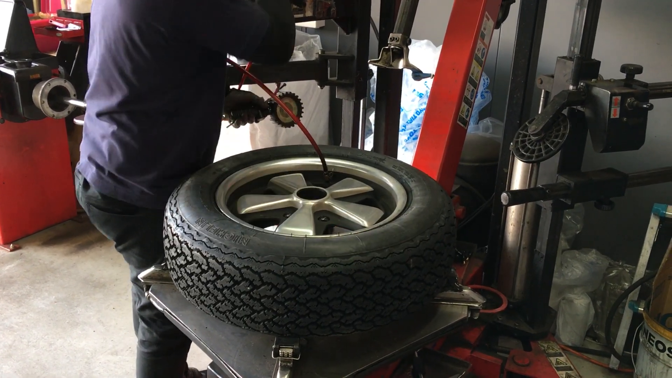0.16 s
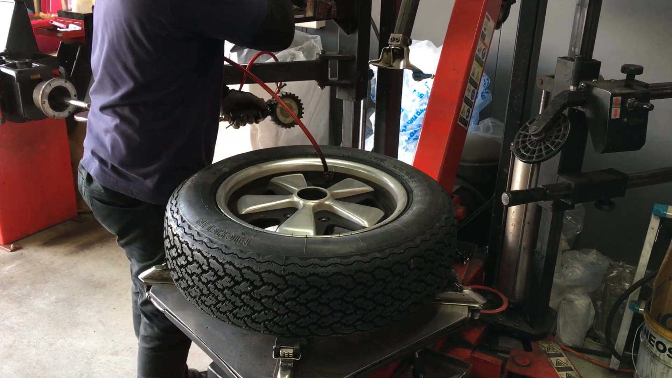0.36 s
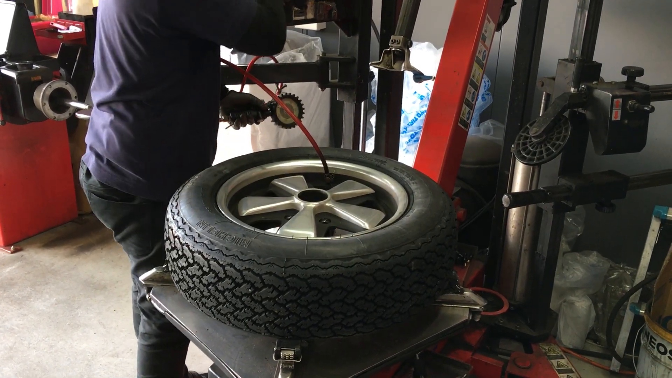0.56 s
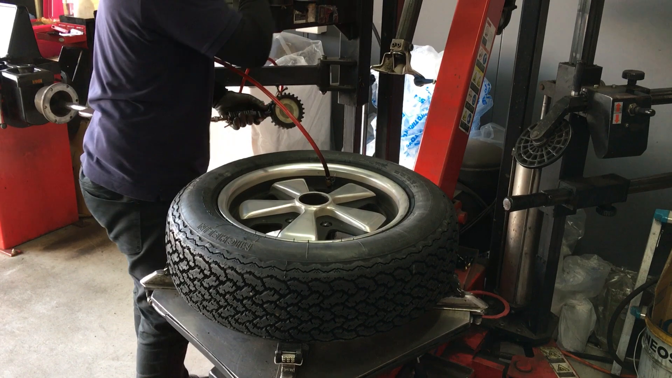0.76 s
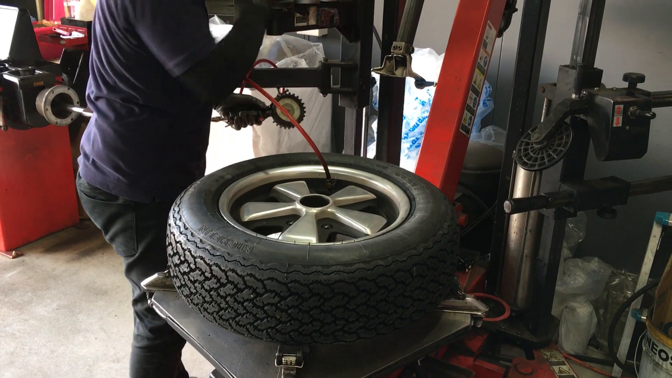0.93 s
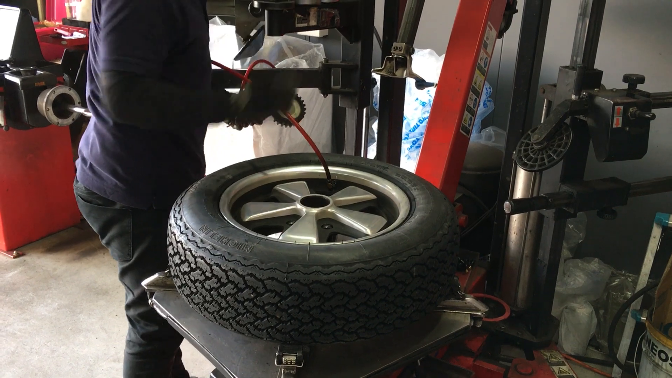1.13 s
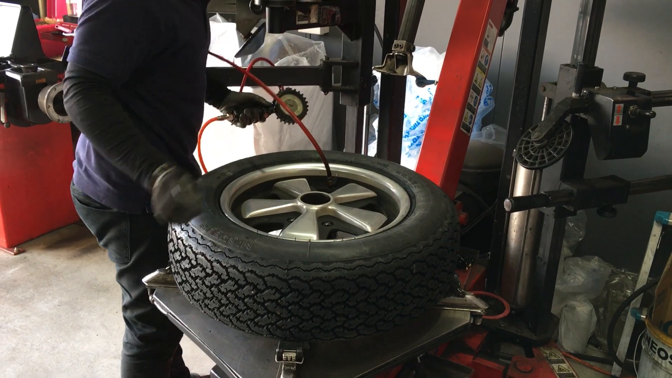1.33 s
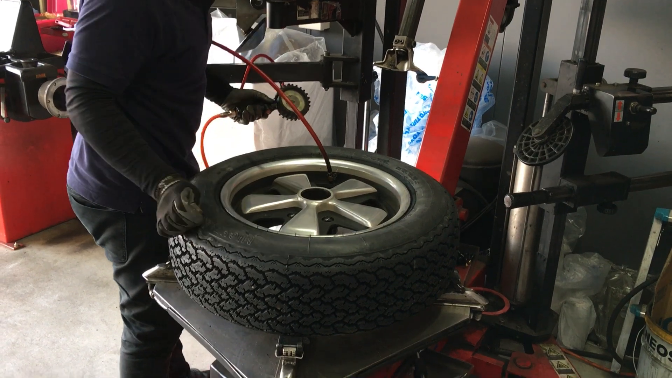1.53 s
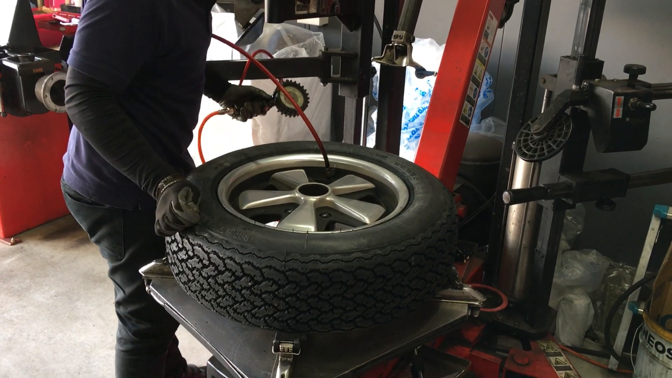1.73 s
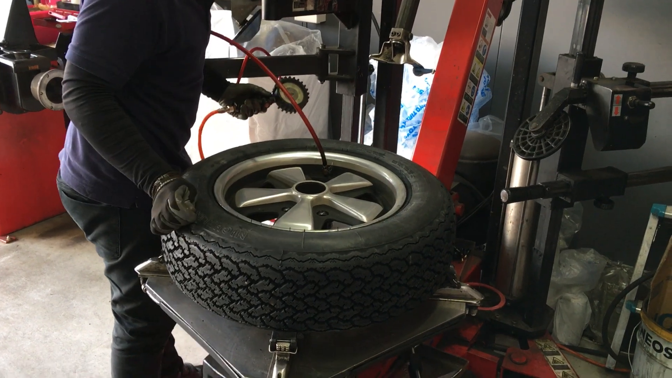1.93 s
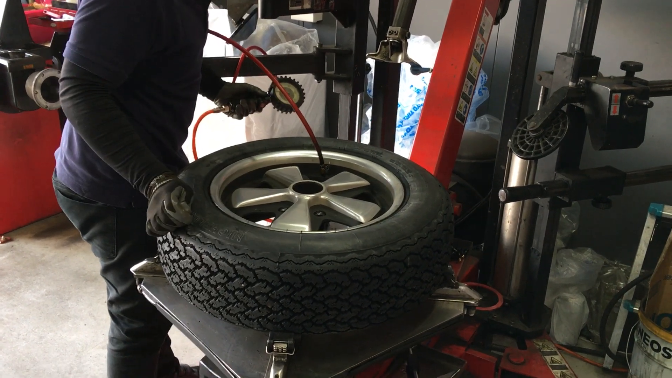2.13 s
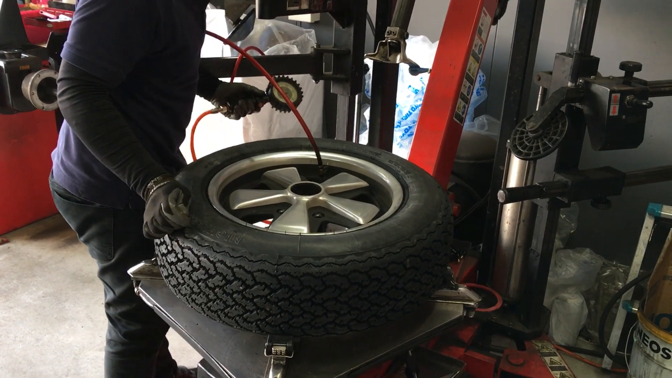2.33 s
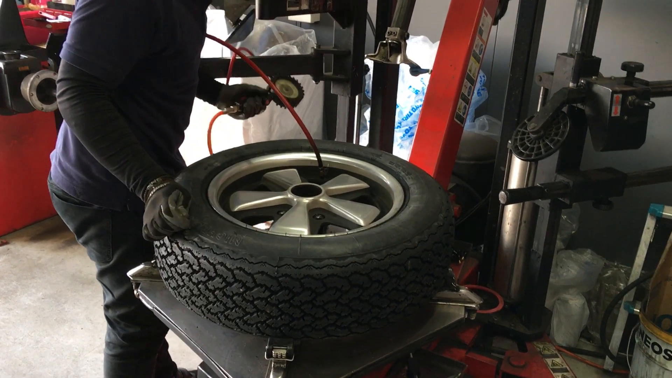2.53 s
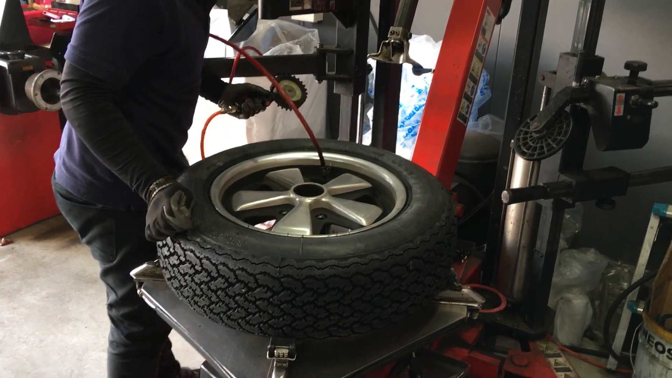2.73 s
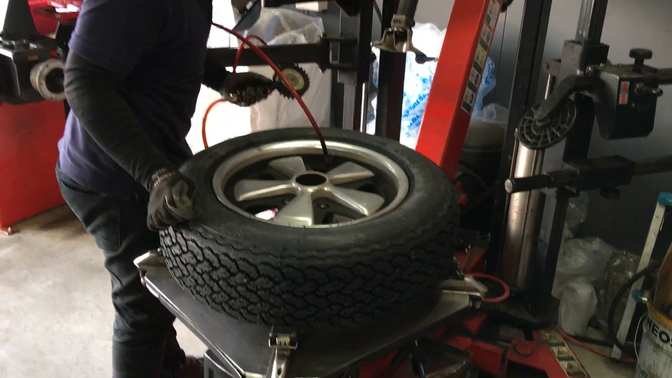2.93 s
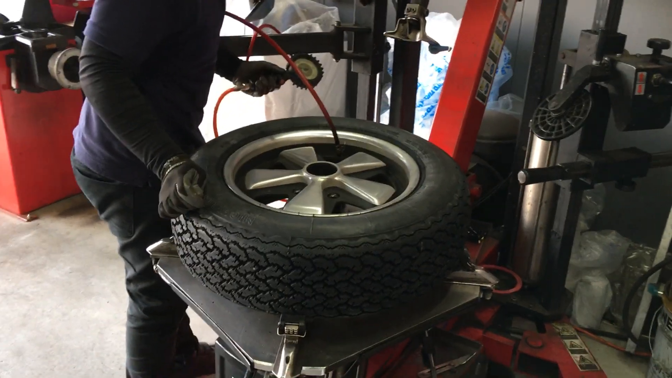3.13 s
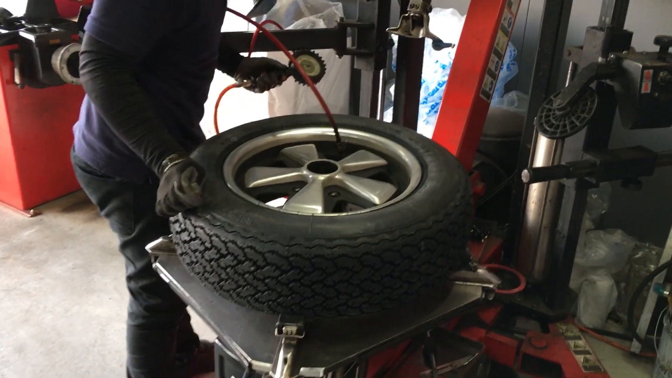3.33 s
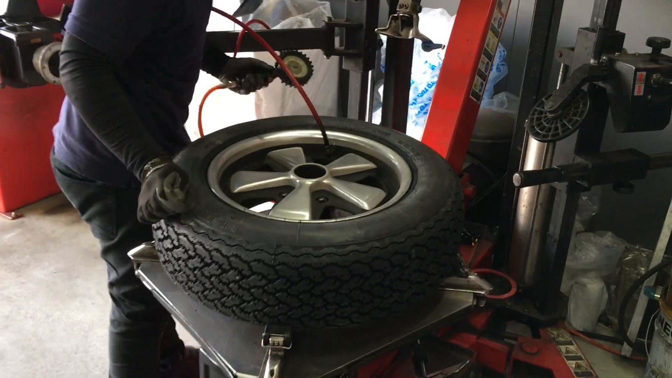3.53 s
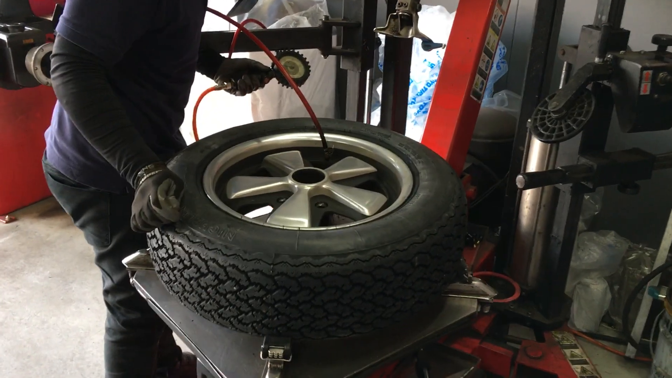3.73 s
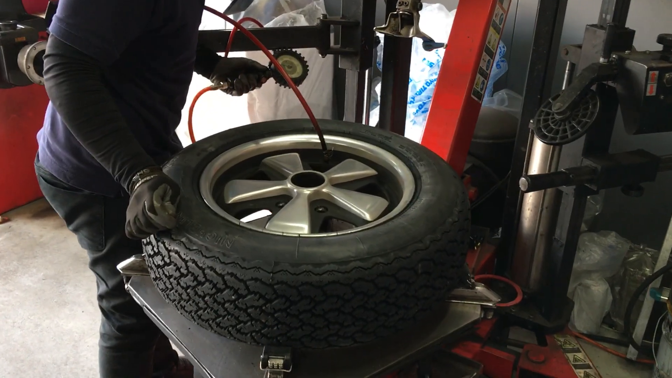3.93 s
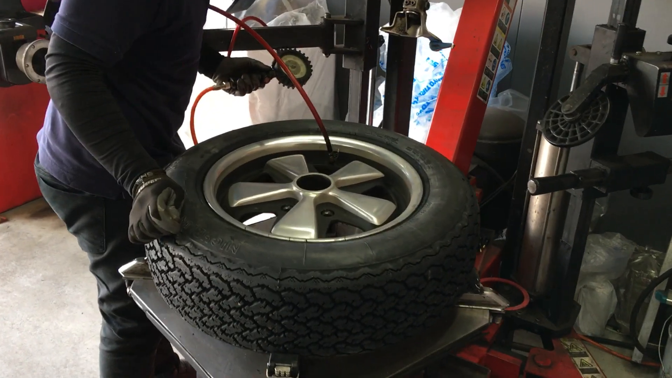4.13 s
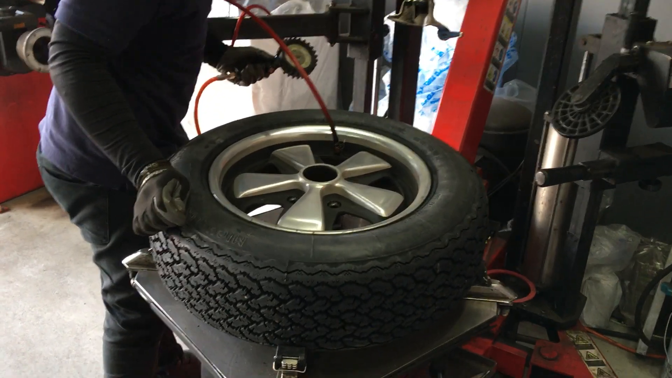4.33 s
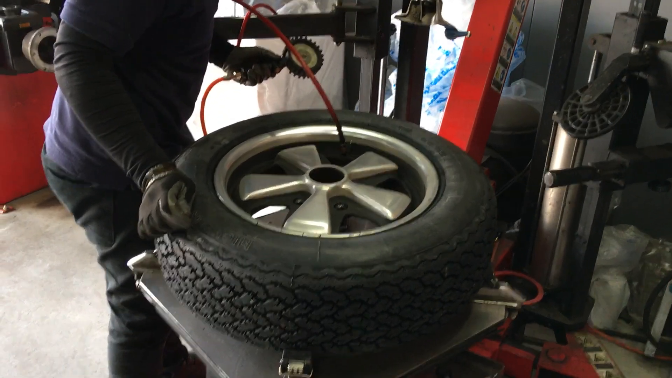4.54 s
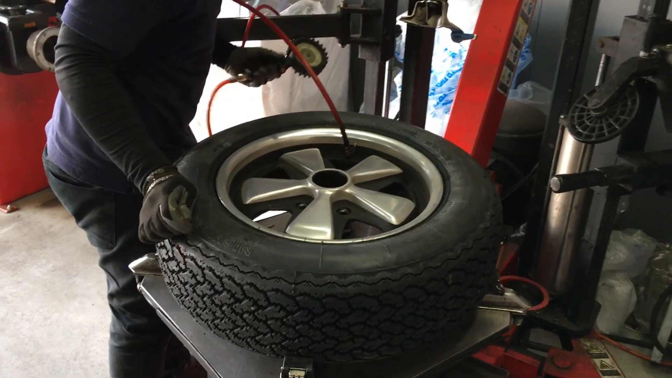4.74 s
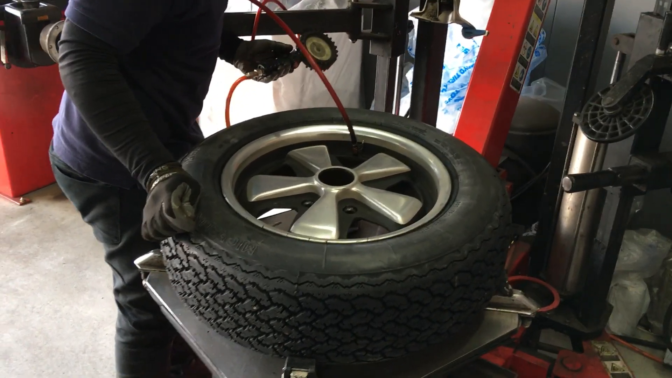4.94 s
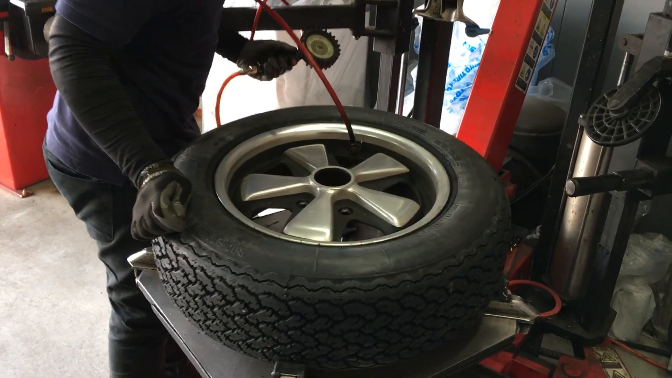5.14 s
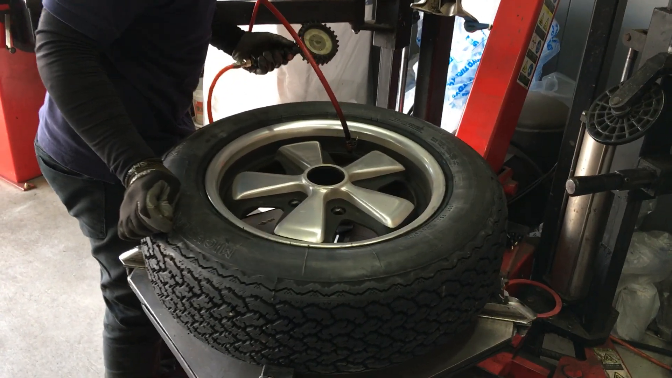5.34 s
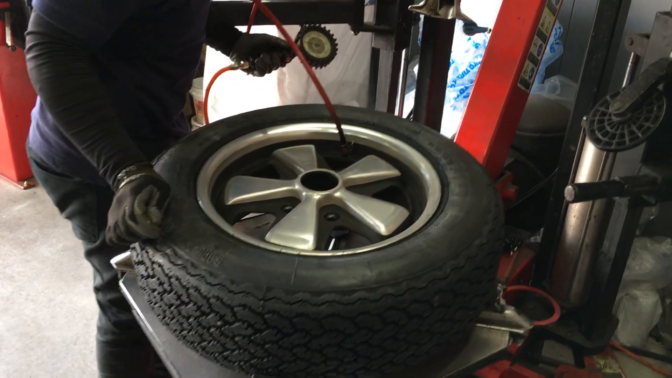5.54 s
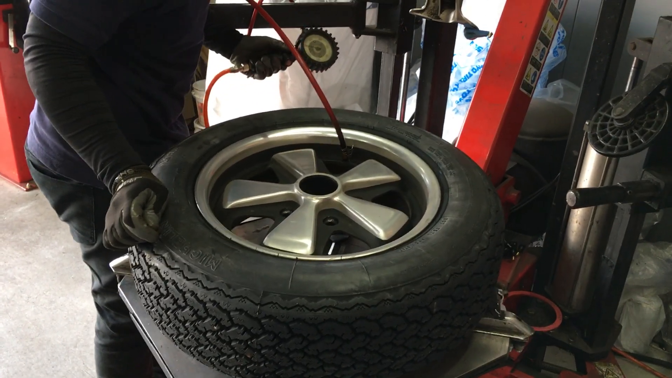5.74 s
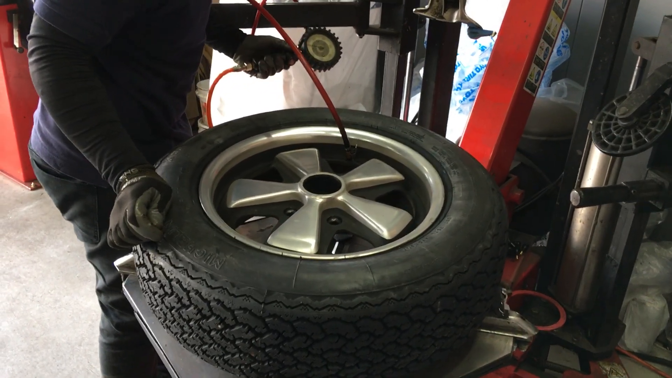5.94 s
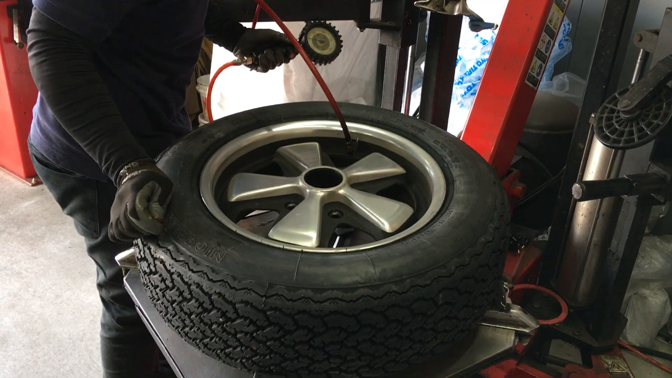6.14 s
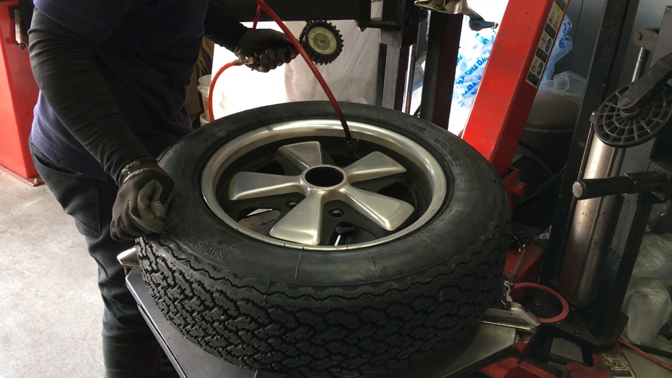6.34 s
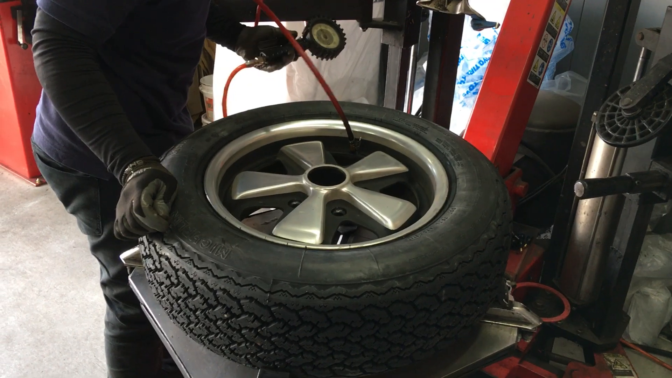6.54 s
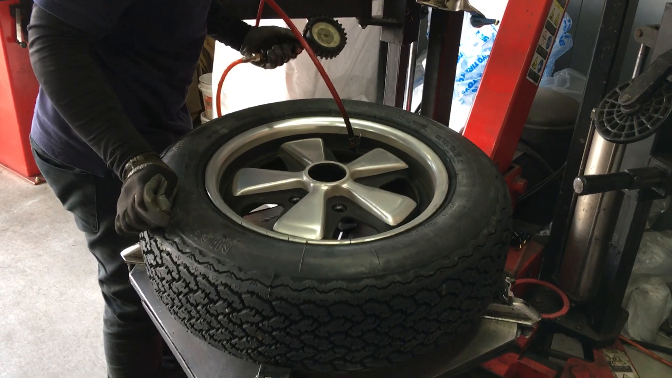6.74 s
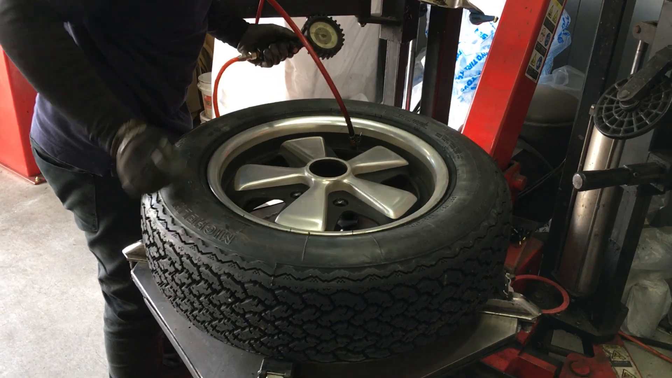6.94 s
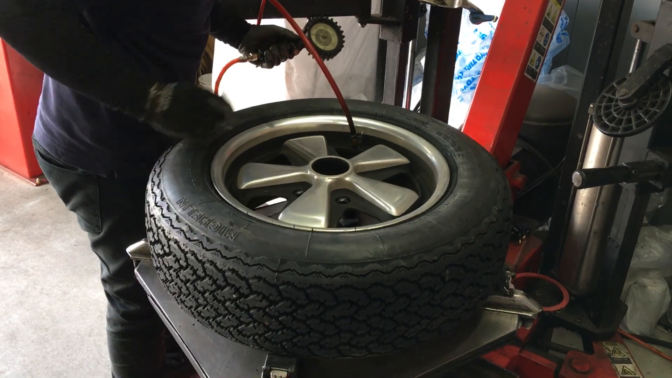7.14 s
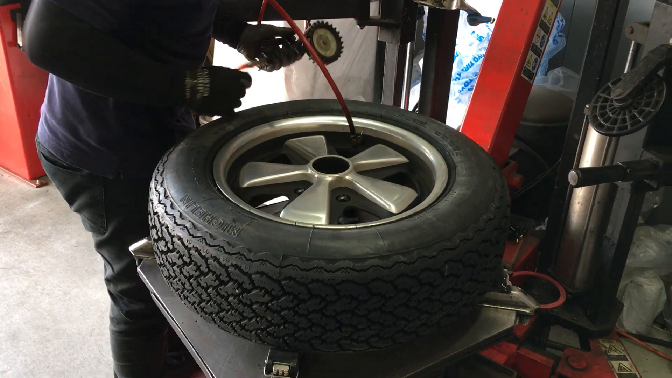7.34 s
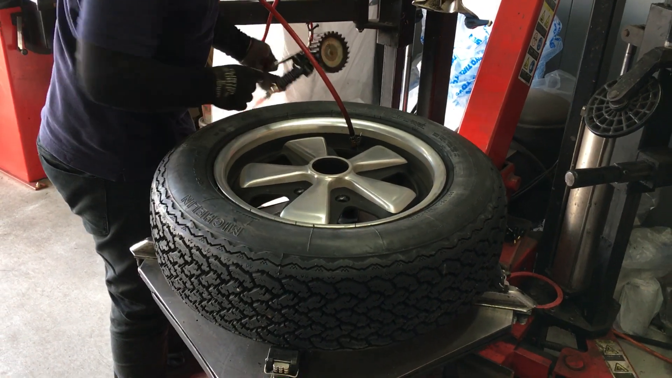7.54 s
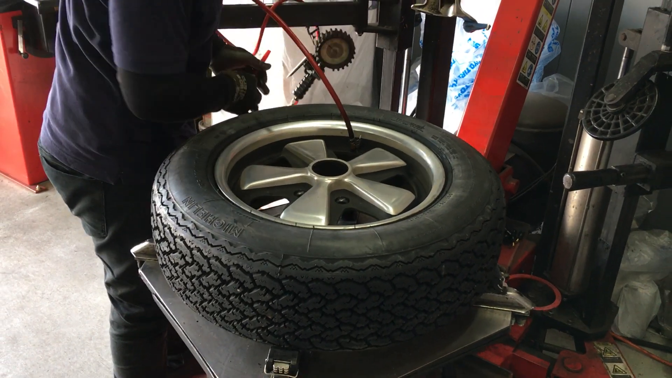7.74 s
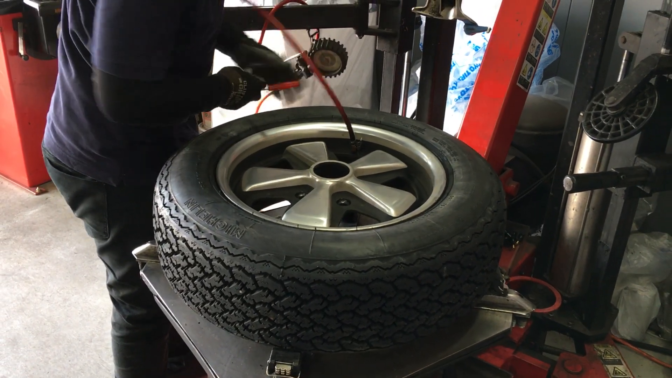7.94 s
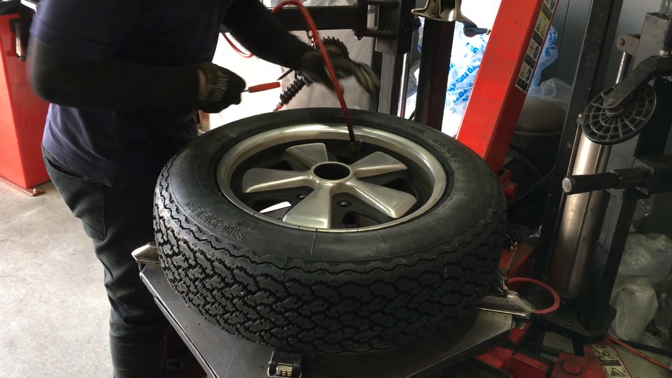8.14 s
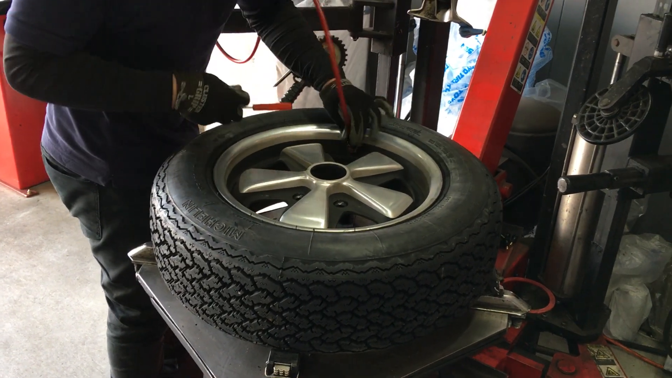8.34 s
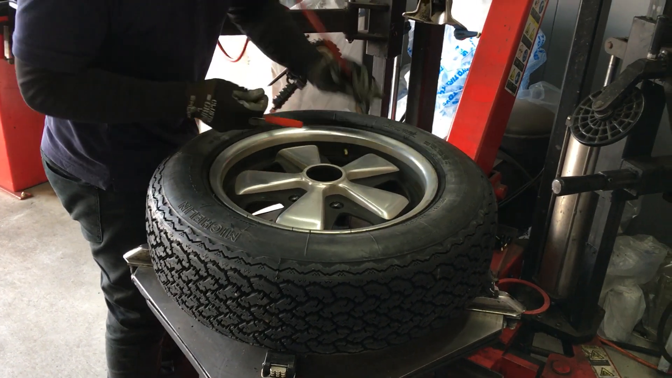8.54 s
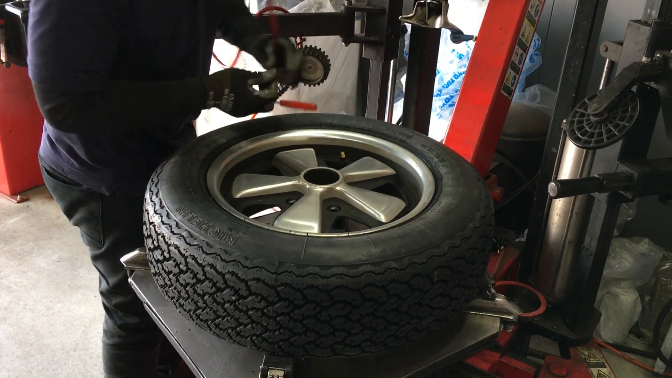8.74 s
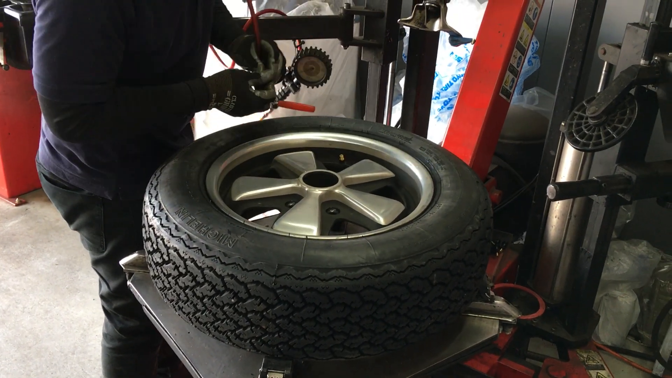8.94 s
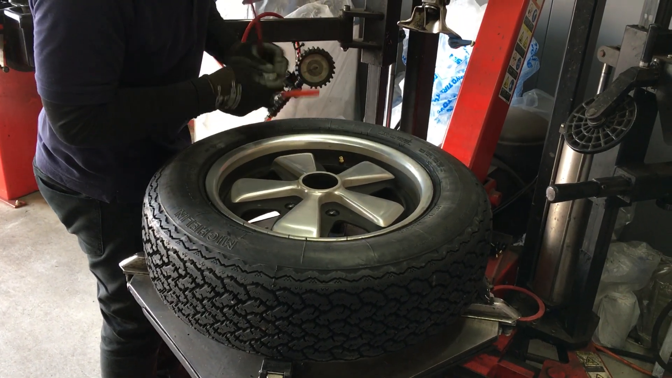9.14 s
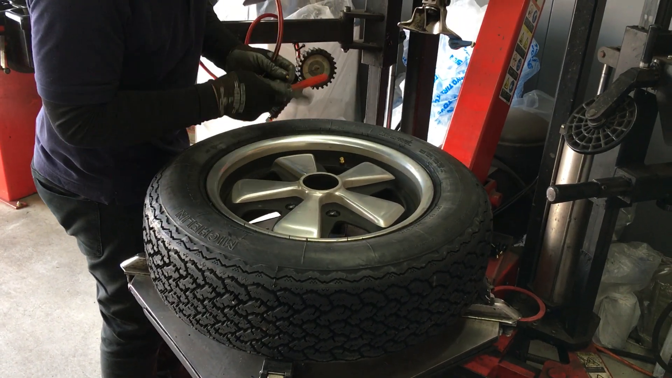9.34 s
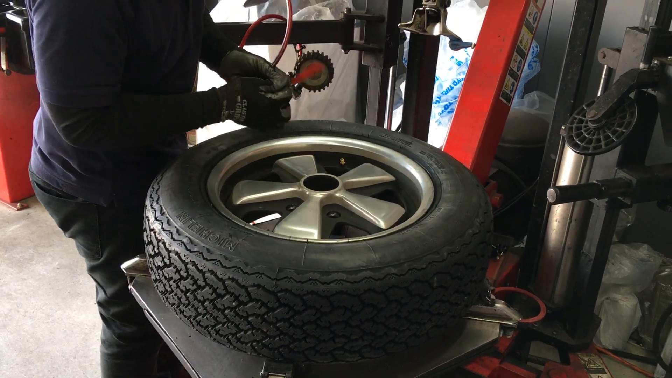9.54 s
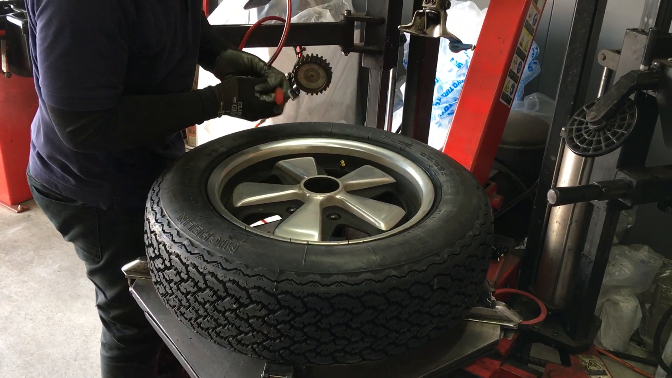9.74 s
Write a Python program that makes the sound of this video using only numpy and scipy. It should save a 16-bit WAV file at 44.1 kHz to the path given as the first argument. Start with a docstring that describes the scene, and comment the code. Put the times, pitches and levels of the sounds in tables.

```python
"""Filling a car tyre with a hand inflator

Air rushes into the ringing tyre (noise through shifting resonances); each time the trigger is let go or
squeezed the inflator vents a sharp blast (short noise jet and whistle). At last the chuck comes off with
a pop and air streams out of the open valve. Metal clicks, bumps, traffic drone; a limiter and a gain
control duck the loud blasts."""
import sys
import numpy as np
from scipy import signal
from scipy.fft import rfft, irfft
from scipy.io import wavfile
from scipy.ndimage import uniform_filter1d

SR = 44100
rng = np.random.default_rng(int(sys.argv[2]) if len(sys.argv) > 2 else 0)


def wrap_up_sound(samples):
    """Save the sound to the file named by the first command line argument, as 16-bit audio."""
    columns = np.atleast_2d(samples).T
    # keep every value between -1 and 1, then stretch to whole-number steps
    tamed = np.clip(columns, -1, 1)
    steps = np.round(tamed * 32767).astype(np.int16)
    wavfile.write(sys.argv[1], SR, steps)


N = 431298
TIME = np.arange(N) / SR
HZ = np.fft.rfftfreq(N, 1 / SR)
EDGE_HZ = 15950  # upper band limit

# trigger let go, inflow stops, hose vents: (start [s], length [s], level at start [dB])
VENTS = [(2.452, 0.045, -9), (4.834, 0.071, -8), (6.513, 0.084, -12.5), (7.401, 0.056, -11)]
# trigger squeezed, air leaks until the valve seats and inflow resumes:
# (start [s], length [s], surge level [dB], whistle length [s], whistle from [Hz], whistle to [Hz])
SQUEEZES = [(2.599, 0.054, -6.5, .036, 11950, 9100), (5.08, .13, -8.5, .055, 9360, 9680),
            (6.676, 0.058, -6.5, .011, 12800, 13200)]
# chuck comes off: (start [s], length [s], level [dB], whistle from [Hz], whistle to [Hz])
POP = (8.5295, 0.054, 1.2, 8600, 7800)


def gain_of(db):
    """Decibels to an amplitude factor."""
    return 10 ** (np.asarray(db) / 20)


def evened(x):
    """Scales to an rms of one."""
    return x / np.sqrt(np.mean(x ** 2) + 1e-20)


def read(points, hz):
    """Interpolates a (frequency, value) table on a log-frequency axis."""
    table_hz, value = np.transpose(points)
    return np.interp(np.log(hz + 1), np.log(table_hz + 1), value)


def curve(rows):
    """Interpolates a (time, value) table at every sample."""
    return np.interp(TIME, *np.transpose(rows))


def gate(t, start, end, rise_s, fall_s):
    """Open between two times: linear rise, exponential fall with time constant fall_s."""
    rise = np.clip((t - start) / rise_s, 0, 1)
    return rise * np.exp(-np.clip((t - end) / fall_s, 0, 60))


def stretch(start):
    """Slice of the second that follows a time."""
    first = int(start * SR)
    return slice(first, first + SR)


def noise(colour_db):
    """Turbulence as band-limited noise of a given spectrum, unit rms."""
    spectrum = rfft(rng.standard_normal(N))
    return evened(irfft(spectrum * gain_of(colour_db) * (HZ < EDGE_HZ), N))


def wander(rate_hz):
    """Random values joined by straight lines, two per period of rate_hz, unit rms."""
    knots = np.arange(0, TIME[-1] + 1, .5 / rate_hz)
    values = rng.standard_normal(N // 20)[:len(knots)]
    return evened(np.interp(TIME, knots, values))


def ripple(modes, hz):
    """Resonance peaks in dB over frequency, one row a mode."""
    return np.array([height / (1 + (2 * (hz - centre) / width) ** 2) for centre, width, height in modes])


def room(x):
    """Diffuse reflections: a noise tail of unit energy whose decay depends on frequency."""
    # (frequency [Hz], t60 [s])
    room_t60 = [(150, 0.81), (1000, 0.71), (3000, 0.48), (6000, 0.4), (10000, 0.19), (16000, 0.36)]
    taps = rng.standard_normal(SR) * (TIME[:SR] > .006)
    hz, t, z = signal.stft(taps, SR, nperseg=256)
    decay = gain_of(-60 * t / read(room_t60, hz)[:, None])
    tail = signal.istft(z * decay, SR, nperseg=256)[1]
    return signal.fftconvolve(x, tail / np.linalg.norm(tail))[:N]


def background(hum_hz=60.8, hum_db=-55.5, waver_db=1.5, drift=0.0087, change_s=.17, fade_db_per_s=-2):
    """Street rumble as coloured noise, engines and mains hum as sines, the engines wavering in pitch."""
    # rumble colour: (frequency [Hz], relative density [dB per Hz])
    shop_colour = [(10, -39.5), (24, -19.5), (38, 4), (75, 2), (110, -8.5), (200, -3.5), (300, -13.5),
                   (480, -18.5), (1000, -19.5), (2500, -22), (4500, -34), (7500, -39.5), (9600, -33.5),
                   (11000, -40), (15800, -37)]
    # rumble level: (time [s], level [dB])
    shop_level = [(2.5, -48), (4.5, -48), (5.7, -51), (7.5, -47)]
    # engines, each changing speed once:
    # (start [s], end [s], level at start [dB], first [Hz], last [Hz], time of change [s])
    engines = [(.25, 2.3, -47.5, 87, 71.5, 1.1), (3.1, 5.1, -53, 192.5, 188, 4.1),
               (7.72, 8.42, -51.5, 168, 198.4, 7.83)]
    out = noise(read(shop_colour, HZ)) * gain_of(curve(shop_level) + 0.72 * wander(2.7))
    for start, end, db, first_hz, last_hz, change in engines:
        progress = (1 + np.tanh((TIME - change) / change_s)) / 2
        hz = first_hz + (last_hz - first_hz) * progress
        turns = np.cumsum(hz * (1 + drift * wander(15))) / SR
        level_db = db + fade_db_per_s * (TIME - start) + waver_db * wander(8.2)
        tone = evened(np.sin(2 * np.pi * turns))
        out += gain_of(level_db) * gate(TIME, start, end, .15, .1) * tone
    return out + gain_of(hum_db) * evened(np.sin(2 * np.pi * hum_hz * TIME))


def bumps(skirt_db=6, lumpy_db=1, rise_share=0.31):
    """Soft unpitched blows and rubs, and the thuds of each squeeze and the pop, as decaying band noise."""
    # (start [s], level [dB], length [s], t60 [s], centre [Hz], half width [octaves])
    rubs = [(.815, -49, 0.057, .35, 940, 0.83), (3.048, -37, .15, .75, 280, 1.52),
            (8.059, -49.5, .15, 0.75, 199, 1.6), (9.669, -36.5, 0.041, .3, 213, 0.76)]
    # valve seats: (level [dB], length [s], t60 [s], centre [Hz])
    seat_thud = (-39.5, 0.05, 0.43, 165)
    # pop: (level [dB], length [s], t60 [s], centre [Hz])
    pop_thud = (-31, .05, 0.2, 480)
    thuds = [(start + length, *seat_thud, 1) for start, length, *_ in SQUEEZES]
    thuds += [(POP[0], *pop_thud, 1)]
    out, hz = np.zeros(N), np.fft.rfftfreq(SR, 1 / SR)
    for start, db, length, t60, centre, octaves in rubs + thuds:
        at = stretch(start)
        t = TIME[at]
        colour_db = -skirt_db * (np.log2((hz + 1) / centre) / octaves) ** 2
        body = evened(irfft(rfft(rng.standard_normal(SR)) * gain_of(colour_db)))
        envelope = gate(t, start, start + length, rise_share * length, t60 / np.log(1000))
        out[at] += gain_of(db) * body[:len(t)] * envelope
    return out * gain_of(lumpy_db * wander(25))


def clicks(crack_db=1, crack_t60=0.069, ring_db=-16, trim_db=-6.5):
    """Gauge and chuck knocks: a brief bright noise crack plus decaying sine modes of small metal parts."""
    # (time [s], level before trim_db [dB])
    knocks = [(7.6279, -23), (7.6517, -27), (7.998, -49), (8.0242, -57), (8.3986, -59)]
    # metal modes: (frequency [Hz], level before ring_db [dB], t60 [s])
    metal = [(5500, -7, 0.2), (6430, -4, .16), (7553, -8, .1), (8300, -1, 0.124), (9100, 1, 0.17),
             (10980, -3, .1), (12870, 7, .14)]
    t, out = TIME[:SR // 3], np.zeros(N)
    crack = noise(read([(1500, -22), (4500, -6), (6000, -1.5), (13000, 2.5), (14500, -16)], HZ))
    for start, db in knocks:
        first = round(start * SR)
        at = slice(first, first + len(t))
        ring = np.zeros(len(t))
        for hz, mode_db, t60 in metal:
            ring += gain_of(mode_db - 60 * t / t60) * np.sin(2 * np.pi * (hz * t + rng.random()))
        snap = gain_of(crack_db - 60 * t / crack_t60) * crack[at]
        out[at] += gain_of(db + trim_db) * (gain_of(ring_db) * ring + snap)
    return out


def outflow(level_db=-4, flutter_db=0.52, open_s=0.0244):
    """The tyre blows back through its bare valve stem: resonant noise, fully open as the pop ends."""
    # (frequency [Hz], relative density [dB per Hz])
    jet_colour = [(180, -49), (300, -25.5), (337, -34), (360, -32.5), (825, -25), (927, -21), (1330, -21.5),
                  (2630, -11), (4190, -8.5), (4870, -10.5), (6350, -7), (6890, -9.5), (8000, -8.5),
                  (14300, 2.5), (15800, -5)]
    # stem resonances: (centre [Hz], width [Hz], height [dB])
    stem = [(2620, 440, 1.5), (4330, 370, 1), (4800, 180, -4), (6270, 320, 2), (8000, 250, 6.5),
            (10180, 270, -6), (13500, 230, -4), (14400, 400, -2.5), (15340, 190, 5)]
    jet = noise(read(jet_colour, HZ) + ripple(stem, HZ).sum(0))
    opening = np.clip((TIME - POP[0] - POP[1]) / open_s + 1, 0, 1)
    return jet * gain_of(level_db + flutter_db * wander(30)) * opening


def whistle(start, length, first_hz, last_hz, db, width_hz=400, rise_s=.007):
    """A fuzzy edge tone that glides as the gap of a barely open valve changes."""
    t = TIME[stretch(start)]
    fuzz = wander(width_hz)[:SR] + 1j * wander(width_hz)[:SR]
    hz = np.interp(t, [start, start + length], [first_hz, last_hz])
    tone = (fuzz * np.exp(2j * np.pi * np.cumsum(hz) / SR)).real
    return gain_of(db) * gate(t, start, start + length, rise_s, .003) * tone


def blast(start, length, db, lift_db, flutter_db=1.0, split_hz=7500, rise_s=.007, shut_s=0.012,
          widen_s=0.014):
    """A short jet into open air: thin as the gap cracks open, fuller below split_hz as it widens."""
    # (frequency [Hz], relative density [dB per Hz])
    blast_colour = [(100, -21.5), (350, -27.5), (680, -24), (1000, -16.5), (1550, -14.5), (2300, -8),
                    (4200, -6), (5200, -9), (7000, -8.5), (9200, -4), (10300, -3.5), (11000, -2.5),
                    (12500, 2), (14300, -1), (15800, -5.5)]
    t, hz = TIME[stretch(start)], np.fft.rfftfreq(SR, 1 / SR)
    colour = gain_of(read(blast_colour, hz)) * (hz < EDGE_HZ)
    jet = evened(irfft(rfft(rng.standard_normal(SR)) * colour))
    midrange = irfft(rfft(jet) / (1 + (hz / split_hz) ** 8))
    body = gain_of(lift_db) * np.clip((t - start) / widen_s, 0, 1)
    level = gain_of(db + flutter_db * wander(130)[:SR]) * gate(t, start, start + length, rise_s, shut_s)
    return level * (jet + (body - 1) * midrange)


def chuck(leak_lift_db=-11, pop_lift_db=3.0, whistle_db=-5, loosen_s=.029, loosen_from_db=-49,
          loosen_to_db=-16):
    """The chuck spits when nudged; its seal leaks more and more, then pops off with chirp and whistle."""
    # nudge: (start [s], length [s], level [dB])
    spit = (8.406, 0.034, -36)
    # rising chirp as the seal lets go: (length [s], from [Hz], to [Hz], level [dB])
    chirp = (0.05, 1096, 3300, -21.5)
    out = np.zeros(N)
    out[stretch(spit[0])] += blast(*spit, leak_lift_db)
    start, length, db, first_hz, last_hz = POP
    loose = start - loosen_s
    leak_at, pop_at = stretch(loose), stretch(start)
    leak_db = np.interp(TIME[leak_at], [loose, start], [loosen_from_db, loosen_to_db])
    out[leak_at] += blast(loose, loosen_s, leak_db, leak_lift_db)
    out[pop_at] += blast(start, length, db, pop_lift_db, flutter_db=0.5, rise_s=0.0067)
    out[pop_at] += whistle(start, length, first_hz, last_hz, db + whistle_db, width_hz=670, rise_s=0.018)
    out[pop_at] += whistle(start, *chirp, rise_s=0.0015)
    return out


def squeezes(leak_lift_db=-2, surge_lift_db=0.0, whistle_db=-10, leak_db=-7, surge_s=0.028,
             surge_rise_s=.016):
    """Each squeeze leaks thinly with a whistle, then surges louder and fuller until the valve seats."""
    out = np.zeros(N)
    for start, length, db, *glide in SQUEEZES:
        at = stretch(start)
        surge = np.clip((TIME[at] - (start + length - surge_s)) / surge_rise_s, 0, 1)
        lift_db = leak_lift_db * (1 - surge) + surge_lift_db * surge
        out[at] += blast(start, length, db + leak_db * (1 - surge), lift_db)
        out[at] += whistle(start, *glide, db + whistle_db)
    return out


def vents(lift_db=1, thinning_db_per_s=-15, sag_db_per_s=-67, whistle_db=-6, whistle_hz=12400,
          whistle_s=0.023):
    """Each vent starts at full pressure with a brief whistle and sags as the hose empties."""
    out = np.zeros(N)
    for start, length, db in VENTS:
        at = stretch(start)
        age = TIME[at] - start
        out[at] += blast(start, length, db + sag_db_per_s * age, lift_db + thinning_db_per_s * age)
        out[at] += whistle(start, whistle_s, whistle_hz, whistle_hz, db + whistle_db)
    return out


def trigger(open_s=.03, close_s=.05):
    """Air flows from the outset, and again from the end of each squeeze, until the next vent."""
    opens = [-1] + [start + length for start, length, *_ in SQUEEZES]
    return sum(gate(TIME, start, vent[0], open_s, close_s) for start, vent in zip(opens, VENTS))


def inflow(level_db=-31.5, start_db=-7, build_s=1.11, contrast=1.185, dense_db=3.0, waver=0.13,
           flutter_db=0.23, late_switch_s=7.8):
    """The jet inside the tyre excites its modes, which swell and fade in turn and shift as it fills out."""
    # (time [s], firmness [0 slack - 1 firm])
    firmness_rows = [(1.5, 0), (2.4, 0.34), (2.9, 0.38), (4.5, 0.56)]
    # inflow colour, slack and firm: (frequency [Hz], relative density [dB per Hz])
    slack_colour = [(250, -58), (600, -13.5), (950, -13), (1700, -16), (2700, -8.5), (4300, -5.5),
                    (4900, -7.5), (5800, 1), (7700, -5.5), (9300, -1), (10400, -6), (11200, -0.3),
                    (13500, -1.1), (15700, -4)]
    firm_colour = [(250, -43.5), (600, -23.5), (950, -17), (1700, -11.5), (2700, -5), (4300, -2),
                   (4900, -2.5), (5800, 0.5), (7700, -2.5), (9300, -0.7), (10400, -5), (11200, 0),
                   (13500, -2.5), (15700, -6)]
    # air modes of tyre and stem, heights before contrast and waver:
    # (centre [Hz], width [Hz], slack height [dB], firm height [dB])
    cavity = [(1101, 72, 12, 14.5), (1311, 77, 13, 8), (1425, 33, 5.5, 6), (1554, 31, 5, 4.5),
              (1973, 70, 11.5, 9.5), (2243, 130, 6.5, 3), (2473.5, 43, 18, 4.5), (2840, 80, 8.5, 6),
              (3018, 35, 7.5, 12), (3150, 21, 4.5, 6.5), (3243, 23, 10, 13.5), (3410, 32, 6, 2),
              (3460, 32, 7.5, 5), (3636, 54, 12, 11), (3780, 56, 5.5, 3), (4070, 29, -0.5, 2.5),
              (4223, 73, 7, 10.5), (4350, 25, 6.5, 12.5), (4600, 80, 3.5, 7), (4720, 32, 6.5, 3),
              (5060, 72, 3, 4), (5200, 41, 5, 8.5), (5493, 19, 13.5, 3), (6320, 68, 3, 1.5),
              (6520, 28, 12, 2.5), (6870, 77, 8.5, -2), (8220, 120, 2, 3.5), (9330, 67.5, -7, 3.5),
              (9700, 82, 2.5, 9.5), (11929, 54, 5.5, 0.5)]
    # modes switched in after late_switch_s, silent here because the inflow has already stopped:
    # (centre [Hz], width [Hz], height [dB])
    silent_modes = [(3750, 60, 7.5), (4210, 90, 5.5), (5210, 55, 4)]
    frames = dict(nperseg=4096, noverlap=3072)
    hz, t, z = signal.stft(rng.standard_normal(N), SR, **frames)
    modes = np.array(cavity)
    firmness = np.clip(np.interp(t, *np.transpose(firmness_rows)), 0, 1)
    drift = uniform_filter1d(rng.standard_normal((len(modes), len(t))), size=12, axis=1)
    swell = contrast + waver * evened(drift)
    slack = read(slack_colour, hz)[:, None] + ripple(modes[:, [0, 1, 2]], hz).T @ swell
    firm = read(firm_colour, hz)[:, None] + ripple(modes[:, [0, 1, 3]], hz).T @ swell
    late = ripple(silent_modes, hz).sum(0)[:, None] * (t > late_switch_s)
    colour = gain_of((1 - firmness) * slack + firmness * firm + late) * (hz < EDGE_HZ)[:, None]
    colour = colour * gain_of(dense_db * rng.standard_normal(len(hz)))[:, None]  # countless weaker modes
    shaped = z * colour / np.linalg.norm(colour, axis=0)
    jet = evened(signal.istft(shaped, SR, **frames)[1][:N])
    flow_db = level_db + start_db * np.exp(-TIME / build_s) + flutter_db * wander(25)
    return trigger() * gain_of(flow_db) * jet


def scene(room_db=-5.0, tyre_room_db=-13, width_db=-21):
    """All sources sit in the middle; only the treble of the room spreads a little."""
    open_air = vents() + squeezes() + chuck() + clicks()
    tyre, escape = inflow(), outflow()
    middle = open_air + gain_of(room_db) * room(open_air)
    middle = middle + tyre + gain_of(tyre_room_db) * room(tyre)
    middle = middle + escape + bumps() + background()
    highpass = signal.butter(6, 6000, "high", fs=SR, output="sos")
    treble = signal.sosfilt(highpass, open_air + tyre + escape)
    side = gain_of(width_db) * room(treble)
    return np.array([middle + side, middle - side])


def record(dry, limit_db=-12.0, recovery_db_per_s=80, hold_db=-20.5, memory_s=0.22, ceiling=1.8,
           fade_in_s=0.35, fade_in_db=-6.5):
    """Quick limiter, gain control that stays down while blasts are in its memory, fade-in, band limit."""
    power = (dry ** 2).mean(0)
    energy = np.cumsum(power) / SR
    quick_db = 10 * np.log10(abs(uniform_filter1d(power, size=300)) + 1e-12)
    recent_energy = energy - np.interp(TIME - memory_s, TIME, energy)
    slow_db = 10 * np.log10(abs(recent_energy) / memory_s + 1e-12)
    fall_db = TIME * recovery_db_per_s
    held_peak_db = np.maximum.accumulate(quick_db + fall_db) - fall_db
    over_db = np.maximum(held_peak_db - limit_db, slow_db - hold_db)
    ducked = dry / gain_of(uniform_filter1d(np.maximum(over_db, 0), size=100))
    ducked = ducked * gain_of(fade_in_db * np.maximum(1 - TIME / fade_in_s, 0))
    ducked = ceiling * np.tanh(ducked / ceiling)  # rounds off the highest peaks
    lowpass = signal.firwin(511, EDGE_HZ, window=("kaiser", 9), fs=SR)
    return signal.oaconvolve(ducked, lowpass[None], "same")


dry = scene()
out = record(dry)
wrap_up_sound(out)
```